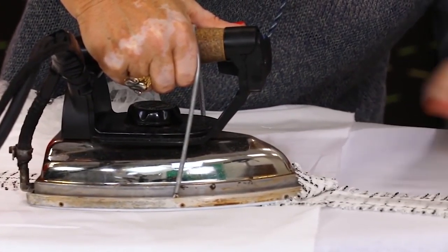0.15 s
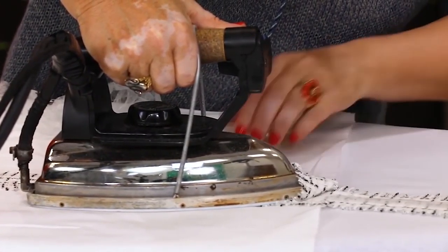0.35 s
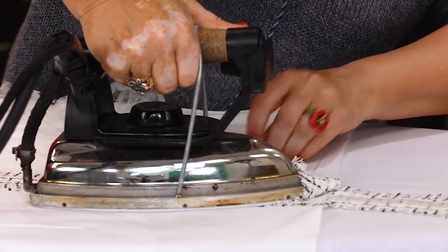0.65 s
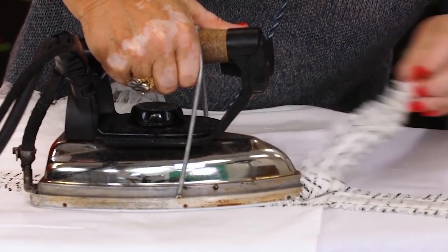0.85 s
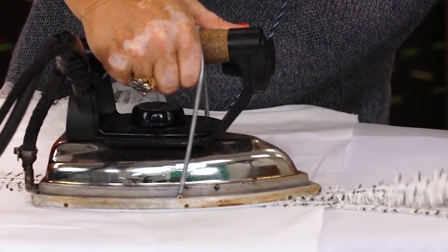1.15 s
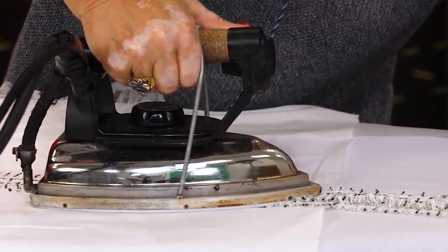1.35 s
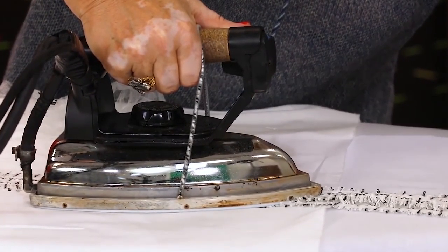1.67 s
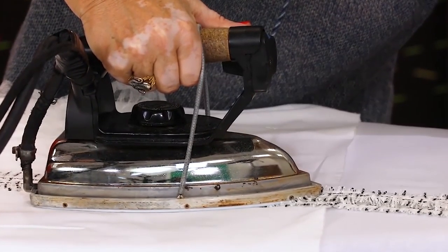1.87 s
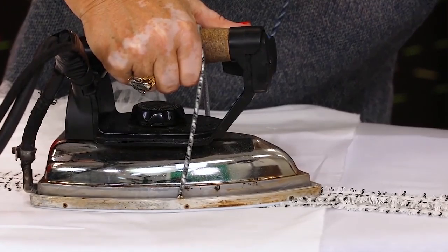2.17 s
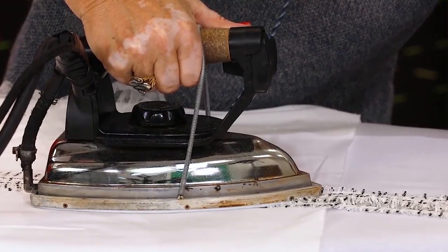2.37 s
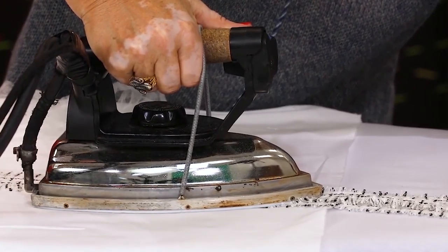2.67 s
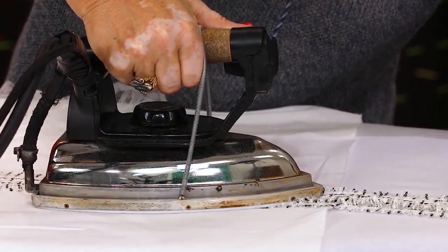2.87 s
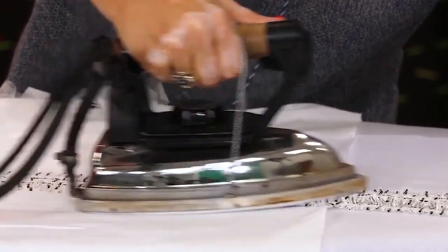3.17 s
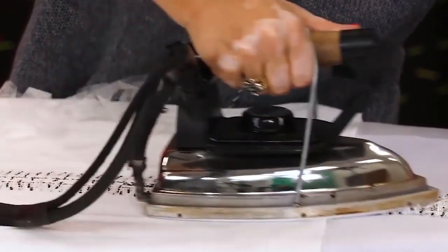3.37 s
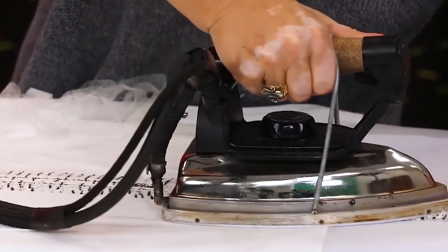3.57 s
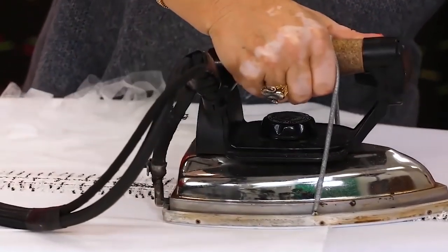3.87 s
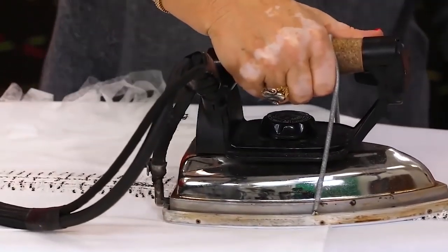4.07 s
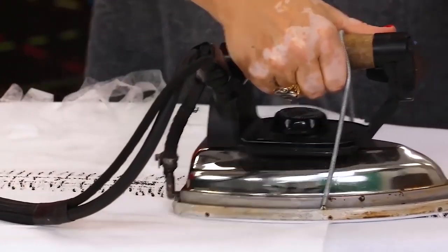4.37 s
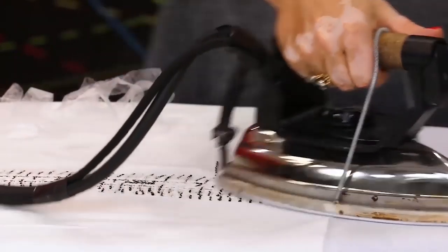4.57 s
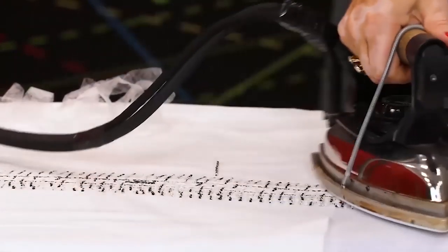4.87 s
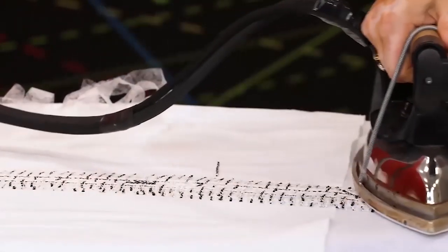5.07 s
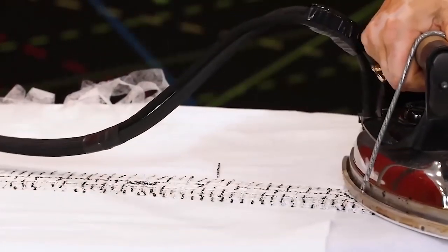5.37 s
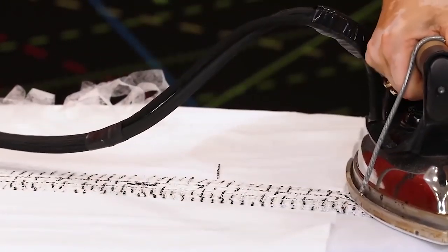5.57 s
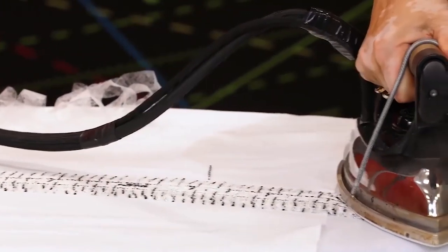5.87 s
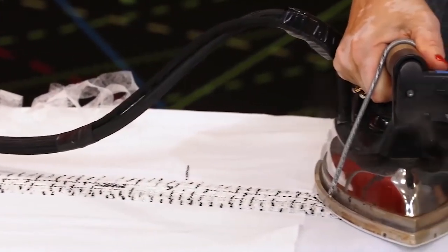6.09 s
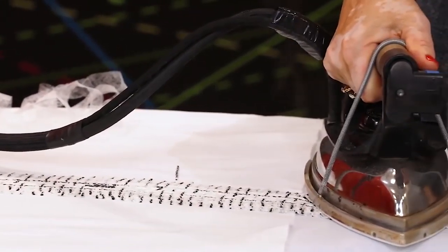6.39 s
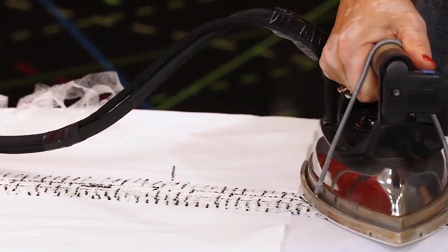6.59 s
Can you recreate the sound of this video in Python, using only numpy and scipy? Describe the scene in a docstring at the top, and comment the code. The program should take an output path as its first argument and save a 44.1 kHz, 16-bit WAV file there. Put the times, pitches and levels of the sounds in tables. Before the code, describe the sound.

A workshop rumbles and hums, then a steam iron clicks and blasts a loud hiss, gives a short breathy puff, clacks and seeps thinly.

```python
"""A workshop rumbles and hums, shaped noise over two beating tones, around a steam iron fed by a hose.
A padded table booms, cloth rustles and small metal parts tick: decaying tones and grainy noise.
The thumb switch clicks and steam rushes through the hollow sole plate and out from under it:
patchy noise coloured by each hollow. The iron bumps and drags on the table between rushes,
and at the end steam seeps on thinly."""
import sys
import numpy as np
from scipy import signal
from scipy.fft import rfft, irfft, next_fast_len
from scipy.io import wavfile
from scipy.ndimage import uniform_filter1d, map_coordinates

SR = 44100
rng = np.random.default_rng(int(sys.argv[2]) if len(sys.argv) > 2 else 0)


def persist_wave(psi):
    """Save psi, clipped to +-1, as 16-bit WAV."""
    counts = np.round(np.clip(psi, -1, 1) * 32767).astype(np.int16)
    wavfile.write(sys.argv[1], SR, np.atleast_2d(counts).T)


def elevation(decibels):
    """Turn decibel levels (scalar or array-like) into linear amplitude ratios."""
    levels = np.asarray(decibels, float)
    return 10 ** (levels / 20)


N = 296793  # length in samples


def unit(x):
    """Scales a sound to an rms of 1."""
    return x / np.sqrt(np.mean(x ** 2) + 1e-20)


def along(points, hz):
    """Reads a curve of (Hz, value) points on a log frequency axis."""
    f, v = np.transpose(points)
    return np.interp(np.log(hz + 1), np.log(f + 1), v)


def spectrum(points):
    """Gain over frequency for a curve of (Hz, dB) points."""
    return lambda f: elevation(along(points, f))


def resonant(modes, steep):
    """Gain of a set of resonances; a larger steep makes their flanks fall faster."""
    def response(f):
        return np.sqrt(sum(elevation(2 * db) / (1 + np.abs(2 * (f - hz) / width) ** steep)
                           for hz, width, db in modes))
    return response


def gains(rows):
    """One gain per sample for each dB column after the time; -120 dB outside the table."""
    s, *columns = np.transpose(rows)
    t = np.arange(N) / SR
    return np.array([elevation(np.interp(t, s, db, left=-120, right=-120)) for db in columns])


def swells(rows):
    """Gain of swells that rise, hold and fall evenly in dB: 30 dB in each rise or fall time."""
    t = np.arange(N) / SR
    total = 0
    for s, hold, rise, fall, db in rows:
        away = np.maximum((s - t) / rise, (t - s - hold) / fall)
        total = total + elevation(db - 30 * np.clip(away, 0, 5))
    return total


def wobble(rate):
    """A smooth random curve with rate knots a second."""
    knots = rng.standard_normal(int(N * rate / SR) + 4)
    return map_coordinates(knots, [np.arange(N) * rate / SR])


def filtered(x, response):
    """Multiplies the spectrum of x by a gain that depends on frequency."""
    m = next_fast_len(N + SR // 2)
    return irfft(rfft(x, m) * response(np.fft.rfftfreq(m, 1 / SR)), m)[..., :N]


def rush(response, patchy_db):
    """Coloured noise of rms 1, with random gain in patches of time and frequency."""
    z = signal.stft(rng.standard_normal(N + SR), nperseg=512)[2]
    field = uniform_filter1d(rng.standard_normal(z.shape), size=5, axis=0)
    field = uniform_filter1d(field, size=8, axis=1)
    noise = signal.istft(z * elevation(patchy_db * unit(field)), nperseg=512)[1][:N]
    return unit(filtered(noise, response))


def add(track, s, sound):
    """Mixes a sound into the track at time s."""
    part = track[round(s * SR):][:len(sound)]
    part += sound[:len(part)]


# Resonances of whoosh, hose, plate cavity, vents, spray and top of the spray.
# Each row: frequency in Hz, width in Hz, level in dB.
WHOOSH_MODES = [(1280, 190, 6), (1600, 450, 7)]
HOSE_MODES = [(2030, 270, -4.5), (2667, 520, 2)]
CAVITY_MODES = [(3180, 460, 1.5), (3606, 460, -1)]
VENT_MODES = [(4340, 620, -16.5), (5350, 1260, -9.5)]
SPRAY_MODES = [(6700, 880, 0.5), (8450, 1740, 2)]
TOP_MODES = [(14000, 6600, 0)]
# Colour of the fizz. Each row: frequency in Hz, relative level in dB per Hz.
FIZZ_COLOUR = [(8800, -62), (9500, -3), (10200, -2), (11100, 0), (11700, -4), (12150, -1), (13500, -17),
               (15500, -16), (16500, -4)]


def steam_paths():
    """Turbulent noise coloured by each path: whoosh, hose, cavity, vent, spray, fizz, top."""
    hollows = (WHOOSH_MODES, HOSE_MODES, CAVITY_MODES, VENT_MODES, SPRAY_MODES)
    paths = [rush(resonant(modes, steep=6), patchy_db=1.4) for modes in hollows]
    # a 5 dB step down above 12200 Hz
    paths.append(rush(lambda f: elevation(along(FIZZ_COLOUR, f) - 5 * (f > 12200)), patchy_db=0.7))
    paths.append(rush(resonant(TOP_MODES, steep=20), patchy_db=-1.0))
    return paths


# The open valve. Each row: time in seconds, flow in dB, vent and spray over it in dB.
BLAST_FLOW = [(3.62, -50, 0.1), (3.627, -49, 0.1), (3.631, -40, -10), (3.66, -42.5, -4), (3.7, -40.5, -1),
              (3.81, -39, 0.6), (3.99, -39, -1), (4.1, -37, -3), (4.172, -40.5, -1), (4.186, -48, 1),
              (4.236, -57.5, 2.5), (4.3, -88, 0.1)]
# One number per path, in the order of steam_paths: level in dB.
BLAST_PATH_DB = (-40, -2.5, -1, -1, 1, -4, -10)
# One number per path: 1 where the third column of the flow is added, else 0.
BLAST_BUILDS = (0, 0, 0, 1, 1, 0, 0)


def blast_power():
    """While the valve stands open one flow drives all paths; vent and spray build on their own."""
    flow, vent_spray = gains(BLAST_FLOW)
    return np.array([(elevation(db) * flow * vent_spray ** builds) ** 2
                     for db, builds in zip(BLAST_PATH_DB, BLAST_BUILDS)])


# Swells of steam escaping round the rocking plate's edge, short spurts through hose and hollow plate, vents
# singing on as pressure bleeds away (the rows at 5.8 and 6.635 s are brief vent-band tails of the ticks there),
# the cavity breathing out, and water sizzling on the hot plate. Each row: time of full level in seconds, hold,
# rise and fall in seconds, level in dB.
WHOOSH_SWELLS = [(3.636, 0.084, 0.032, 0.14, -43), (4.06, 0.095, 0.083, 0.21, -37),
                 (4.812, 0.014, 0.041, 0.056, -43), (5.482, 0.031, 0.035, 0.074, -43)]
SPURT_SWELLS = [(3.198, 0.0019, .006, .02, -54), (3.245, 0.011, 0.036, 0.074, -47.5),
                (4.104, 0.017, 0.43, 0.18, -30), (4.336, 0.017, 0.037, 0.11, -49),
                (4.805, 0.02, 0.18, 0.055, -54.5), (5.48, 0.0091, 0.012, 0.066, -41)]
BLEED_SWELLS = [(3.198, 0.007, .006, 0.045, -56), (4.3, .06, .06, .1, -67), (4.82, .03, .02, .1, -65),
                (4.89, 0.051, 0.05, 0.2, -51), (5.05, .05, .05, .2, -53), (5.46, 0.18, .02, .3, -52.5),
                (5.8, .03, .01, 0.13, -60), (6.635, 0.0091, 0.011, .08, -51)]
SIGH_SWELLS = [(3.632, 0.014, 0.0061, 0.088, -40.5), (4.91, 0.033, .1, 0.1, -65),
               (5.33, 0.076, 0.055, 0.25, -72), (5.45, 0.013, 0.02, .04, -40.5),
               (5.52, 0.14, 0.055, 0.65, -54.5), (5.8, 0.053, .3, .15, -68)]
SIZZLE_SWELLS = [(3.31, 0.055, 0.13, 0.4, -52.5), (4.35, .04, .08, 0.17, -67), (4.912, .05, .1, .15, -59),
                 (5.45, 0.015, 0.03, 0.089, -46), (5.9, 0.033, 0.36, .25, -50.5)]
# How each kind sounds. One number per path, in the order of steam_paths: level in dB.
WHOOSH_PATH_DB = (-0.5, -4, -16, -24, -29, -33, -39)
SPURT_PATH_DB = (-20, -5, -4, -9.5, -21, -18, -26)
BLEED_PATH_DB = (-18, -8, -11, -3.5, -14, -34, -14)
SIGH_PATH_DB = (-8, -11, 1, -20, -11, -20, -20)
SIZZLE_PATH_DB = (-25, -22, -24, -23, -8.5, 0, -15)


def escape_power():
    """Each kind of escaping steam shares its flow among the paths, and their powers add up."""
    kinds = [(WHOOSH_SWELLS, WHOOSH_PATH_DB), (SPURT_SWELLS, SPURT_PATH_DB), (BLEED_SWELLS, BLEED_PATH_DB),
             (SIGH_SWELLS, SIGH_PATH_DB), (SIZZLE_SWELLS, SIZZLE_PATH_DB)]
    return sum(np.outer(elevation(path_db), swells(rows)) ** 2 for rows, path_db in kinds)


# One free puff with the plate lifted. Each row: time in seconds, flow in dB.
PUFF_FLOW = [(5.0, -70), (5.02, -73), (5.046, -41), (5.078, -27.5), (5.174, -25.5), (5.266, -32.5),
             (5.36, -59), (5.4, -69)]
# One number per path, in the order of steam_paths: level in dB, then delay in seconds,
# then the power to which the sound follows the flow.
PUFF_PATH_DB = (-10.5, -13.5, -14, -14.5, -17.5, -19.5, -29)
PUFF_DELAY = (0.013, -0.009, -0.029, -0.0095, 0.039, 0.03, .01)
PUFF_POWER = (1.13, 0.68, 1.9, 1.2, 2.2, 2, 1.2)
# Colour of the puff in open air. Each row: frequency in Hz, relative level in dB per Hz.
OPEN_AIR_COLOUR = [(530, -50), (900, -33), (1110, -19), (1210, -14.5), (1510, 0), (1980, -1), (2430, 2),
                   (3120, -2), (9000, -23.5), (11700, -46), (19800, -120)]


def puff():
    """Returns the puff's power in each path, every path with its own delay, and its open-air noise."""
    flow = gains(PUFF_FLOW)[0]
    power = []
    for db, delay, steep in zip(PUFF_PATH_DB, PUFF_DELAY, PUFF_POWER):
        shaped = flow * (flow / flow.max()) ** (steep - 1)
        power.append((elevation(db) * np.roll(shaped, round(delay * SR))) ** 2)
    free = flow * elevation(-4) * rush(spectrum(OPEN_AIR_COLOUR), patchy_db=0.0)
    return np.array(power), free


# Air pushed from under the plate.
# Each row: time of full level in seconds, hold, rise and fall in seconds, level in dB.
GUST_SWELLS = [(3.244, .01, 0.018, 0.17, -48.5), (3.66, 0.033, .05, 0.54, -49.5),
               (4.148, 0.031, 0.34, 0.085, -36), (4.36, 0.0067, 0.038, 0.093, -43.5),
               (5.15, 0.097, 0.51, 0.23, -46.5)]
# Resonances of the gusts. Each row: frequency in Hz, width in Hz, level in dB.
GUST_MODES = [(795, 520, 1.5), (1045, 290, 5)]


def gusts():
    """Air pushed from under the plate swells as low resonant noise."""
    return swells(GUST_SWELLS) * rush(resonant(GUST_MODES, steep=4), patchy_db=1.6)


# The thin seep. Each row: time in seconds, level in dB.
SEEP_LEVEL = [(5.44, -74), (5.47, -54), (5.65, -63), (5.85, -59), (6.06, -53.5), (6.4, -53.5),
              (6.73, -51.5)]
# Its colour. Each row: frequency in Hz, relative level in dB per Hz.
SEEP_COLOUR = [(650, -25), (1100, -2.5), (1650, -5), (2200, -17.5), (2640, -11.5), (3810, -11), (4720, -18),
               (7140, -20.5), (8540, -13), (9350, -17.5), (11300, -6.5), (12600, -16.5), (15100, -15),
               (16000, -14)]


def seep():
    """A thin leak hisses as coloured noise."""
    return gains(SEEP_LEVEL)[0] * rush(spectrum(SEEP_COLOUR), patchy_db=0.6)


def steam():
    """Steam in the iron and in open air flutters with the same turbulent flow; only the seep does not."""
    puff_power, free_puff = puff()
    power = blast_power() + escape_power() + puff_power
    inside = np.sum(np.sqrt(power) * steam_paths(), axis=0)
    flutter = elevation(0.5 * wobble(40) + 0.5 * wobble(150))
    return seep() + flutter * (gusts() + free_puff + inside)


# Switch clicks. Each row: time in seconds, level in dB, extra level of the treble modes in dB.
SWITCH_CLICKS = [(3.618, -2, -11.5), (4.1733, -3, -11.5), (5.436, -1.5, -21)]
# Ringing of the housing. Each row: frequency in Hz, level in dB, time to fall 60 dB in seconds.
HOUSING_MODES = [(3660, -0.5, 0.0017), (5280, -1.5, 0.0043), (7340, -6, 0.0035), (10400, 11.5, 0.0026),
                 (11930, 12, 0.0039), (14000, -8, .004)]


def switch():
    """The switch snaps and bounces twice within a few ms, ringing its small housing; the bright share varies."""
    out, t = np.zeros(N), np.arange(SR // 40) / SR
    contact = 1 - np.exp(-t / 0.00053)
    bounces = ((0.0006, -2), (0.0018, -8.5), (0.0032, -21.5))  # delay in s, level in dB
    for s, db, treble_db in SWITCH_CLICKS:
        for delay, bounce_db in bounces:
            ring = 0
            for hz, level, t60 in HOUSING_MODES:
                fade = elevation(level + treble_db * (hz > 9000) - 60 * t / t60)
                ring = ring + fade * np.sin(2 * np.pi * (hz * t + rng.random()))
            crack = 0.2 * elevation(-60 * t / 0.0052) * rng.standard_normal(len(t))
            add(out, s + delay, elevation(db + bounce_db) * contact * (ring + crack))
    return out


# The plate meets the table edge. Each row: time in seconds, level in dB.
EDGE_CLACKS = [(4.801, -18), (4.8065, -27.5), (5.474, -11.5)]
# Ringing of the plate. Each row: frequency in Hz, level in dB, time to fall 60 dB in seconds.
PLATE_MODES = [(1546, -3.5, 0.03), (2800, -3, 0.015), (3320, -3.5, 0.014), (5000, -18, 0.013),
               (7000, -23, 0.009)]


def clacks():
    """A hard contact rings the plate's own modes, each a little louder or softer every time."""
    out, t = np.zeros(N), np.arange(SR // 10) / SR
    contact = 1 - np.exp(-t / 0.00046)
    for s, db in EDGE_CLACKS:
        ring = sum(elevation(level + 0.88 * rng.standard_normal() - 60 * t / t60) * np.sin(2 * np.pi * hz * t)
                   for hz, level, t60 in PLATE_MODES)
        add(out, s, elevation(db - 4.5) * contact * ring)
    return out


# Ticks of small metal parts. Each row: time in seconds, level in dB, pitch in Hz,
# spread to either side in octaves, time to fall 60 dB in seconds.
METAL_TICKS = [(1.2241, -29, 8620, 0.16, 0.0093), (1.9131, -21.5, 1750, 0.22, 0.024),
               (1.934, -45, 1900, 0.22, 0.027), (1.95, -46, 2000, .25, .03),
               (3.1945, -32.5, 3660, 0.55, 0.011), (3.2214, -36, 2960, 0.25, 0.011),
               (3.2378, -32, 2920, 0.14, 0.011), (3.418, -27, 9400, 0.45, 0.014),
               (3.477, -35, 8200, 0.26, 0.0087), (3.592, -38, 3200, 0.42, 0.011),
               (3.6295, -22, 7000, 1.05, 0.0092), (3.702, -9, 3070, 0.4, 0.01),
               (4.231, -22.5, 3200, 0.43, 0.011), (4.3804, -38, 5000, 0.4, 0.011),
               (4.646, -26, 624, 0.2, 0.03), (4.7677, -37, 3300, 0.2, 0.0093),
               (4.7686, -37, 9560, 0.23, .006), (4.779, -23.5, 754, 0.49, 0.016),
               (4.9888, -52.5, 5400, 0.5, 0.011), (5.331, -42, 6500, .6, .008),
               (5.7925, -23.5, 6000, 0.23, 0.012), (5.89, -34, 2180, 0.65, 0.015),
               (6.3966, -31, 1190, 0.36, 0.012), (6.56, -28.5, 1600, 0.18, 0.014),
               (6.628, -21.5, 5190, 0.46, 0.018)]


def ticks():
    """Each tick is seven short-lived modes round its pitch, roughly in step when the contact peaks."""
    out, t = np.zeros(N), np.arange(SR // 10) / SR
    peak_s = 0.0012
    contact = np.sin(np.pi / 2 * np.clip(t / peak_s, 0, 1)) ** 2
    for s, db, hz, spread, t60 in METAL_TICKS:
        octaves = spread * np.linspace(-1, 1, num=7) + 0.02 * rng.standard_normal(7)
        pitch = np.clip(hz * 2 ** octaves, 100, SR / 2.3)[:, None]
        phase = 0.8 * rng.standard_normal((7, 1))
        ring = np.sin(2 * np.pi * pitch * (t - peak_s) + phase).sum(axis=0)
        add(out, s, elevation(db - 13.5 - 60 * t / t60) * contact * ring)
    return out


# Booms of the table top. Each row: time in seconds, level in dB, pitch in Hz, rise in seconds,
# time to fall 60 dB in seconds.
TABLE_BOOMS = [(0.57, -10, 63.3, 0.045, 0.046), (4.545, -14.5, 58.3, 0.052, 1), (4.66, -31, 60, .03, 0.42)]
# Dull knocks of valve and iron. Each row: time in seconds, level in dB, pitch in Hz,
# time to fall 60 dB in seconds.
DULL_KNOCKS = [(.585, -21.5, 262, 0.064), (3.634, -14, 307, 0.074), (4.192, -22, 267.7, 0.22),
               (5.4469, -15, 210, 0.042)]
# The plate drags on the cloth.
# Each row: time of full level in seconds, hold, rise and fall in seconds, level in dB.
DRAG_SWELLS = [(4.655, 0.037, 0.011, 0.11, -30)]
# Resonances of the drag. Each row: frequency in Hz, width in Hz, level in dB.
DRAG_RESONANCES = [(447, 106, 1), (563, 110, -7.5), (860, 320, -15)]


def table():
    """Booms swell and die in the table top, knocks ring dully, and the plate drags in stick-slip jerks."""
    out, t = np.zeros(N), np.arange(SR // 2) / SR
    for s, db, hz, rise, t60 in TABLE_BOOMS:
        swell = np.clip(t / rise, 0, 1) ** 0.37 * elevation(-60 * np.clip(t - rise, 0, None) / t60)
        add(out, s, elevation(db) * swell * np.sin(2 * np.pi * hz * t))
    for s, db, hz, t60 in DULL_KNOCKS:
        ring = sum(level * np.sin(2 * np.pi * hz * ratio * t)
                   for ratio, level in ((1, 1), (0.65, 0.067), (1.333, 0.57)))
        add(out, s, elevation(db - 60 * t / t60) * ring / 2)
    drag = rush(resonant(DRAG_RESONANCES, steep=4.3), patchy_db=1.5) * elevation(2.5 * wobble(60))
    return out + swells(DRAG_SWELLS) * unit(drag)


# Rustles of fabric, and of the thumb pressing the switch at 3.594 s.
# Each row: time of full level in seconds, hold, rise and fall in seconds, level in dB.
RUSTLE_SWELLS = [(.085, .01, .2, .1, -67), (.59, 0.071, 0.055, .2, -58.5), (1.074, .06, .15, .1, -72),
                 (3.594, .025, .01, .02, -53), (4.674, .03, 0.29, 0.45, -61)]
# Colour of the rustles. Each row: frequency in Hz, relative level in dB per Hz.
RUSTLE_COLOUR = [(2350, -56), (4000, -20), (4480, -16.5), (5570, -2), (6470, -17), (7010, -5), (10000, -1),
                 (15700, 0.5)]


def rustles():
    """Faint, grainy, bright rustles of fabric, and of the thumb pressing the switch at 3.594 s."""
    grains = elevation(1.1 * wobble(90)) * rush(spectrum(RUSTLE_COLOUR), patchy_db=-0.5)
    return swells(RUSTLE_SWELLS) * unit(grains)


# Echo decay. Each row: frequency in Hz, time to fall 60 dB in seconds.
ROOM_DECAY = [(300, 0.82), (2000, 0.086), (10000, 0.16)]


def room(x):
    """The room answers with a noise tail, after 450 samples, in which each frequency dies at its own speed."""
    hz, t, z = signal.stft(rng.standard_normal(SR // 3), SR, nperseg=256)
    fade = elevation(-60 * t / along(ROOM_DECAY, hz)[:, None])
    tail = signal.istft(z * fade, SR, nperseg=256)[1]
    return signal.fftconvolve(np.pad(x, (450, 0)), tail / np.linalg.norm(tail))[:N]


# Background levels. Each row: time in seconds, deep rumble in dB, workshop noise in dB.
WORKSHOP_LEVELS = [(0, -33, -36.5), (1.46, -32.5, -37), (2.59, -29.5, -37), (3.09, -31.5, -35.5),
                   (3.5, -29.5, -34), (3.92, -33, -36.5), (4.85, -30.5, -35.5), (5.49, -32, -34),
                   (6.73, -30, -36)]
# Colours of rumble and of machine noise. Each row: frequency in Hz, relative level in dB per Hz.
RUMBLE_COLOUR = [(9, -47), (15, -13), (45, -2), (60, -1.5), (72, -1.5), (88, -6), (120, -26), (160, -31),
                 (260, -120)]
MACHINE_COLOUR = [(65, -22), (110, -8), (125, -7.5), (235, -13.5), (279, -17), (297, -25), (387, -24),
                  (418, -27), (982, -35), (1060, -36.5), (4500, -69), (5850, -103), (9900, -120)]
# Modes of the room. Each row: frequency in Hz, width in Hz, boost in dB.
ROOM_BOOSTS = [(168.3, 5, 7), (224.5, 41, 2), (394.6, 20, 6), (436.5, 29, 5)]


def workshop():
    """Deep rumble, machine noise lifted by the room's modes, and a mains hum that beats with a slower motor."""
    deep, broad = gains(WORKSHOP_LEVELS)
    rumble = deep * elevation(0.34 * wobble(3.3)) * rush(spectrum(RUMBLE_COLOUR), patchy_db=-1.4)

    def machines(f):
        boost = sum(db / (1 + (2 * (f - hz) / width) ** 2) for hz, width, db in ROOM_BOOSTS)
        return elevation(along(MACHINE_COLOUR, f) + boost)

    noise = broad * rush(machines, patchy_db=1.23)
    mains_hz, motor_hz, first_dip_s = 99.98, 96.97, 0.19
    mains_rms_db, motor_rms_db = -37, -41
    turn = 2 * np.pi * (np.arange(N) / SR - first_dip_s)
    start = 2 * np.pi * rng.random()
    mains = elevation(mains_rms_db) * np.sin(mains_hz * turn + start)
    motor = elevation(motor_rms_db) * np.sin(motor_hz * turn + start)
    # the two tones oppose each other at the first dip; sqrt(2) turns rms into peak
    return rumble + noise + np.sqrt(2) * (mains - motor)


def scene():
    """The iron close by, its clicks answered by the room, over the workshop."""
    snaps, taps = switch(), ticks() + clacks()
    echoes = elevation(-17.0) * room(snaps) + elevation(-9.5) * room(taps)
    return (steam() + snaps + taps + echoes + table() + rustles() + workshop())[None]


def low_pass(x):
    """Removes everything above the highest recorded frequency."""
    return signal.sosfilt(signal.butter(12, 16650, fs=SR, output="sos"), x)


# Colour of the microphone's hiss. Each row: frequency in Hz, relative level in dB per Hz.
HISS_COLOUR = [(1760, -7.5), (3000, -2.5), (5420, -5), (11700, -6.5), (15100, -3.5), (16200, -22),
               (16500, -46)]


def record(dry):
    """The microphone adds its own hiss and lets only a hundredth through above its band limit."""
    hiss_db, top_hz = -70.5, 15740
    noisy = dry + elevation(hiss_db) * rush(spectrum(HISS_COLOUR), patchy_db=2.3)
    mix = filtered(noisy, lambda f: 1 / (1 + (f / top_hz) ** 400) + 0.01)
    return low_pass(mix)


dry = scene()
out = record(dry)
persist_wave(out)
```